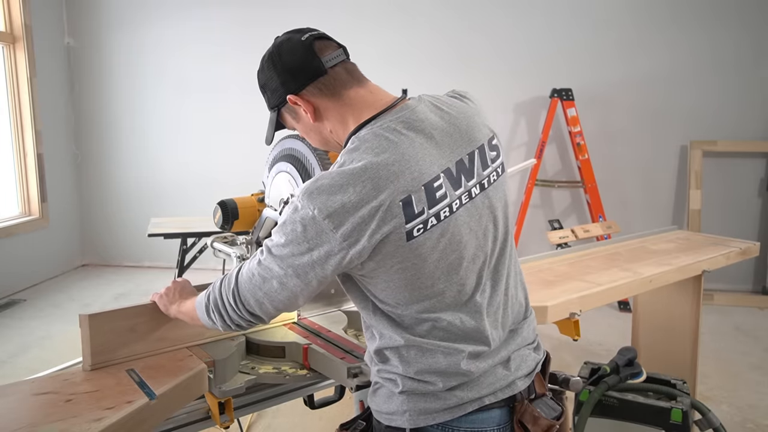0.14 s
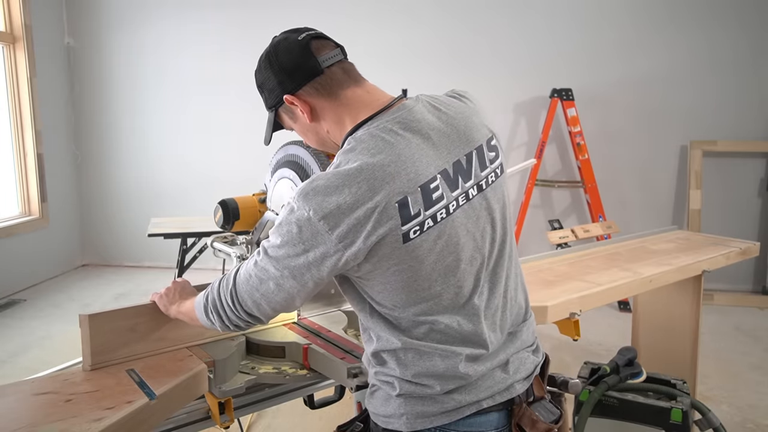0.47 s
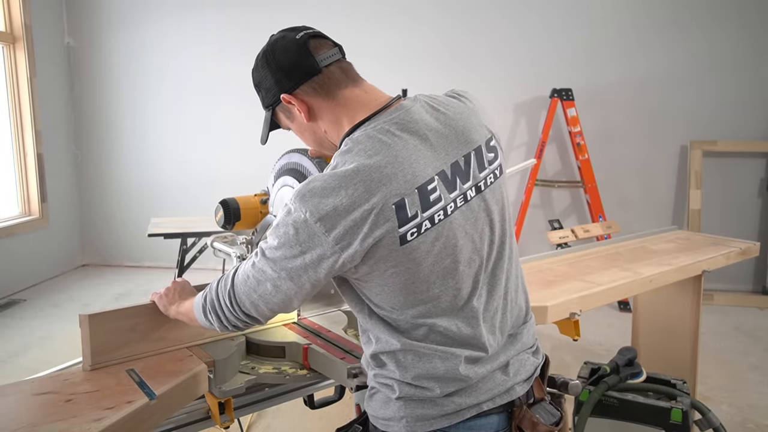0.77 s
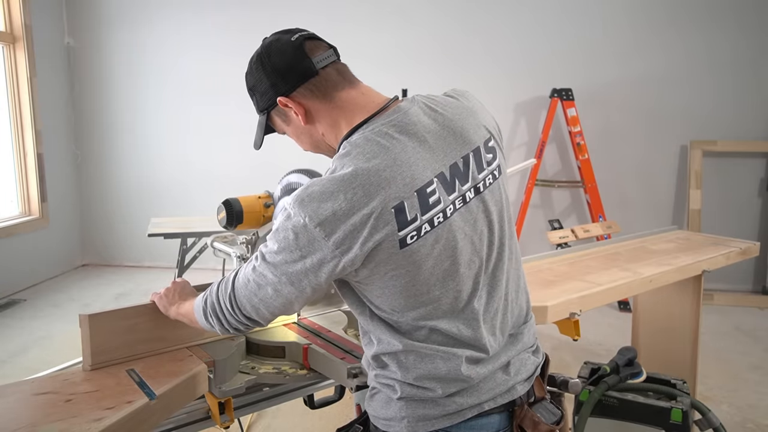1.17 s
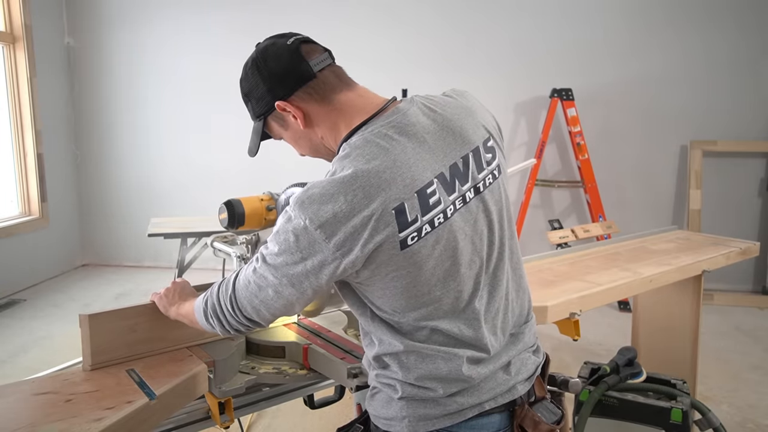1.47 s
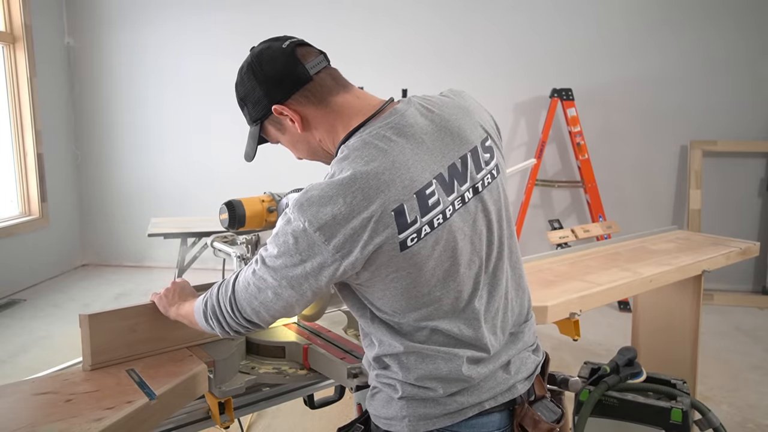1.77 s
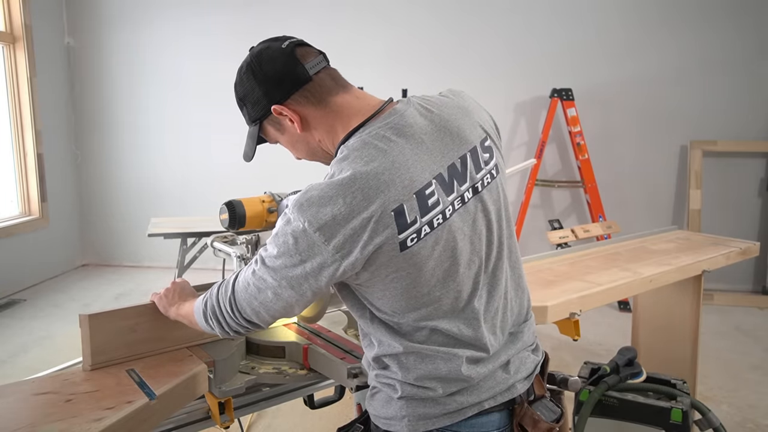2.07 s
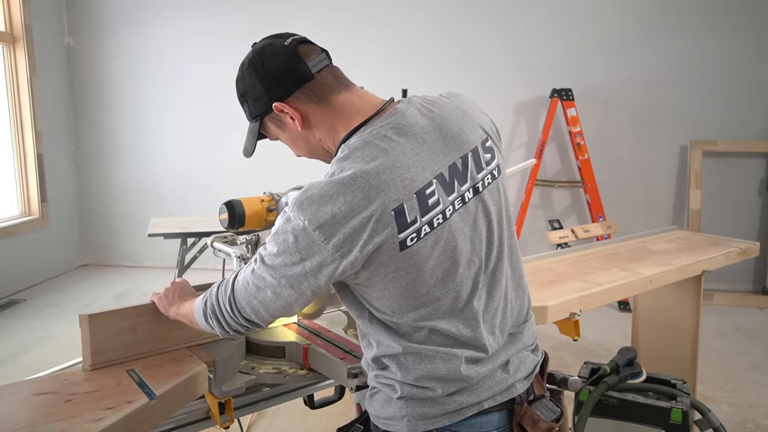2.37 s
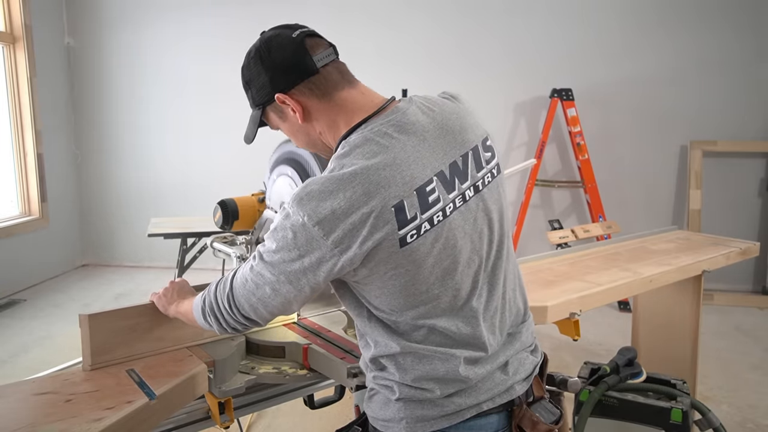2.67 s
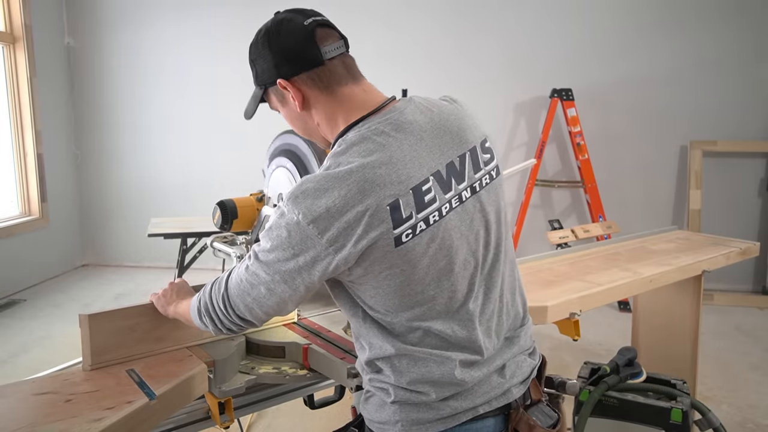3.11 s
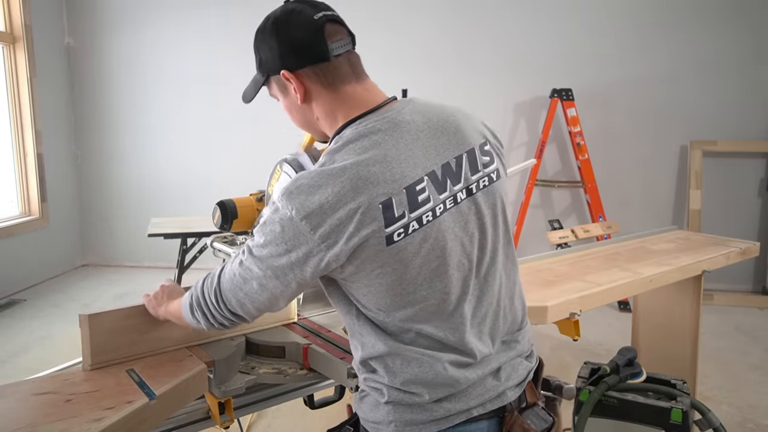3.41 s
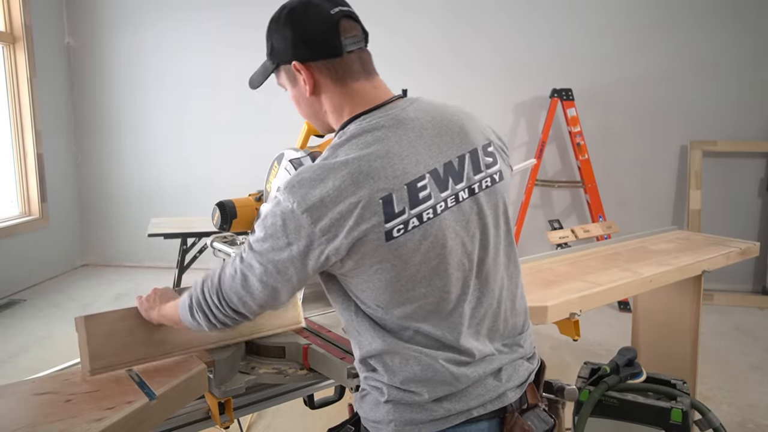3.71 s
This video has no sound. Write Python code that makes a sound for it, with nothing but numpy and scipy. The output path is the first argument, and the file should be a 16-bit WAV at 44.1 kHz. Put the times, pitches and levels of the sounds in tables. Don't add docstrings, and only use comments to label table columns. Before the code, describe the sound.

A power miter saw in a bare, echoing room: trigger clack, fast rising motor whine and roar, gritty wood cutting, then a braked falling whine, gear knocks and a thud as the head stops; close microphone.

```python
import sys
import numpy as np
from scipy import signal
from scipy.fft import rfft, irfft, next_fast_len
from scipy.io import wavfile
from scipy.ndimage import uniform_filter1d

SR = 44100
rng = np.random.default_rng(int(sys.argv[2]) if len(sys.argv) > 2 else 0)


def pcm_store(signal):
    levels = np.round(np.clip(np.atleast_2d(signal), -1, 1) * 32767)
    wavfile.write(sys.argv[1], SR, levels.astype(np.int16).T)


def gain_from_decibels(decibels):
    exponent = np.asarray(decibels, float) / 20
    return 10 ** exponent


N = 169785
T = np.arange(N) / SR
START_S, BRAKE_S = 0.112, 2.61
TONE_FADE_DB = 3


def rms_one(x):
    return x / np.sqrt(np.mean(x ** 2) + 1e-20)


def in_time(rows):
    t_s, *columns = np.transpose(rows)
    return [np.interp(T, t_s, column) for column in columns]


def drift(rate_hz):
    pole = np.exp(-80 * np.pi * rate_hz / SR)
    slow = signal.lfilter([1], [1, -2 * pole, pole * pole], rng.standard_normal(N // 40 + 2002))[2000:]
    return np.interp(np.arange(N) / 40, np.arange(len(slow)), rms_one(slow))


def bump(centre_s, length_s):
    return np.exp(-(2 * (T - centre_s) / length_s) ** 2)


def body(hz):
    # [f/Hz, width/Hz, gain/dB]
    housing = [(670, 140, 6), (850, 40, 5), (1065, 30, 7), (1220, 90, 5), (1460, 70, 12), (1650, 50, 7),
               (2010, 100, 8), (2200, 300, 11), (2650, 60, 13), (3130, 70, 6), (3950, 250, 8),
               (4750, 150, 13), (4970, 120, 12), (5720, 110, 8), (6600, 200, 7), (8060, 170, 9),
               (8650, 170, 11), (9350, 150, 13)]
    # [f/Hz, width/Hz, gain/dB]
    plate = [(7100, 140, 6), (9820, 160, 9), (10080, 80, 8), (10520, 60, 5), (11770, 60, 14),
             (12450, 120, 7), (13500, 200, 12), (14780, 90, 14), (15300, 130, 9)]
    power = 1
    for mid_hz, width_hz, gain_db in [*housing, *plate]:
        power = power + gain_from_decibels(2 * gain_db) / (1 + (2 * (hz - mid_hz) / width_hz) ** 2)
    return np.sqrt(power)


def colour(x, spectrum, share=0):
    hz = np.arange(N // 2 + 1) * SR / N + 1
    at_hz, db = np.transpose(spectrum)
    gain = gain_from_decibels(np.interp(np.log(hz), np.log(at_hz), db))
    return rms_one(irfft(rfft(x) * gain * body(hz) ** share, N))


def patchy(x, patchy_db):
    octave = np.clip(np.log2(np.arange(N // 2 + 1) * SR / N + 1), 5, 14)
    spectrum = rfft(x)
    together, out = drift(14), 0
    for k in range(5, 15):
        part = np.cos(np.pi / 2 * np.clip(octave - k, -1, 1)) ** 2
        out = out + irfft(spectrum * part, N) * gain_from_decibels(patchy_db * (together + 0.8 * drift(20)))
    return out


def knocks(rows, modes, crack_s, crack_hz):
    out = np.zeros(N)
    t = np.arange(int(0.3 * SR)) / SR
    band = signal.butter(2, [400, crack_hz], "band", fs=SR, output="sos")
    for at_s, peak_db, bright_db in rows:
        ring = 0
        for hz, db, t60_s in modes:
            ring = ring + gain_from_decibels(db + 2 * rng.standard_normal() - 60 * t / t60_s) * np.sin(2 * np.pi * hz * t)
        crack = np.exp(-t / crack_s) * signal.sosfilt(band, rng.standard_normal(len(t)))
        hit = gain_from_decibels(peak_db) * (ring + gain_from_decibels(bright_db + 12) * crack)
        start = int(at_s * SR)
        out[start:start + len(t)] += hit[:N - start]
    return out


def room(x):
    t60_s, cut_hz = 0.99, 1830
    size = next_fast_len(N + SR)
    w = 2 * np.pi * np.arange(size // 2 + 1) / size
    dull = 1 / (1 + 1j * w * SR / (2 * np.pi * cut_hz)) ** 0.33
    echoes = 0
    for k, lag in enumerate((rng.uniform(0.02, 0.055, 10) * SR).astype(int)):
        loop = gain_from_decibels(-60 * lag / SR / t60_s) * dull * np.exp(-1j * w * lag)
        echoes = echoes + (-1) ** k * loop / (1 - loop)
    return irfft(rfft(x, size) * echoes, size)[:N]


def room_floor():
    # [f/Hz, level/dB]
    floor_spectrum = [(15, -43), (25, 2), (90, -1.5), (318, -19), (833, -19), (3180, -35), (3730, -40),
                      (15000, -31)]
    return gain_from_decibels(-55) * colour(rng.standard_normal(N), floor_spectrum)


def bench_rumble():
    # [t/s, level/dB]
    rumble_level = [(.1, -48), (.6, -49), (1.2, -72), (2.1, -51), (2.8, -51), (3.0, -56), (3.48, -58),
                    (3.55, -48), (3.85, -54)]
    low_pass = signal.butter(2, 71, fs=SR, output="sos")
    low = rms_one(signal.sosfilt(low_pass, rng.standard_normal(N)))
    return gain_from_decibels(in_time(rumble_level)[0] + 1.4 * drift(1.3)) * low


def finger_on_trigger():
    # [t/s, peak/dB, brightness/dB]
    taps = [
        (.024, -67, 0),
        (.032, -62, 0),
        (.054, -57, 0),
        (.081, -57, 0),
        (.098, -57, 0),
    ]
    # [f/Hz, level/dB, t60/s]
    grip_modes = [(825, 14, 0.025), (1410, -6, .04), (1960, 1, 0.066), (2920, -9, 0.035)]
    return knocks(taps, grip_modes, crack_s=0.011, crack_hz=3200)


def trigger_switch():
    # [t/s, peak/dB, brightness/dB]
    clacks = [
        (.1122, -23.5, 3),
        (.1165, -12.5, -10),
        (.1225, -17, -16),
        (.141, -20.5, -22),
    ]
    # [f/Hz, level/dB, t60/s]
    switch_modes = [(626, -7, 0.11), (1596, 2.5, 0.028), (1976, 2.5, 0.025), (2620, -10, 0.047),
                    (3860, -11, 0.016), (6540, -2, 0.026)]
    return knocks(clacks, switch_modes, crack_s=0.0047, crack_hz=7900)


def gear_backlash():
    # [t/s, peak/dB, brightness/dB]
    strikes = [
        (3.178, -19, -9),
        (3.220, -13, -6),
    ]
    # [f/Hz, level/dB, t60/s]
    case_modes = [(1150, -2, .03), (2230, 0, .035), (2700, -8, .03), (5800, -7, .02)]
    return knocks(strikes, case_modes, crack_s=0.00081, crack_hz=5100)


def head_stop():
    # [t/s, peak/dB, brightness/dB]
    landings = [
        (3.5155, -20.5, -4),
        (3.518, -13.5, -15),
        (3.524, -16, -30),
        (3.545, -29, -9),
        (3.575, -29, -18),
    ]
    # [f/Hz, level/dB, t60/s]
    arm_modes = [(230, -30, .04), (410, -21, .06), (610, -7, .04), (690, -4, 0.07), (790, -8, .03),
                 (920, -4.5, 0.027), (1186, -6, 0.025), (2320, -20, 0.05), (2920, -30, 0.018)]
    return knocks(landings, arm_modes, crack_s=0.0065, crack_hz=5050)


def shaken_parts():
    # [t/s, length/s, f/Hz, rms/dB]
    ringing = [
        (.25, .1, 1500, -32),
        (.45, .25, 2650, -30),
        (.5, .15, 1445, -26),
        (2.32, .15, 12500, -37),
        (2.81, .08, 2010, -27),
        (3.08, .12, 2655, -28),
        (3.1, .12, 3900, -35),
        (3.2, .1, 2240, -33),
        (3.635, .03, 6800, -42),
        (3.76, .15, 1500, -41),
    ]
    width_hz, out = 35, 0
    for at_s, length_s, hz, db in ringing:
        flutter = drift(width_hz) + 1j * drift(width_hz) + 1
        tone = np.real(flutter * np.exp(2j * np.pi * hz * T))
        out = out + 0.8 * gain_from_decibels(db) * bump(at_s, length_s) * tone
    return out


def exit_grit():
    sizes = gain_from_decibels(4 * np.minimum(rng.exponential(1, N), 3)) * rng.choice([-1, 1], N)
    grains = sizes * (rng.random(N) < 4000 / SR)
    spectrum = [(1500, -25), (3500, 3), (7000, -6), (15000, -4)]  # f/Hz, level/dB
    return gain_from_decibels(-24) * bump(2.5, 0.14) * colour(grains, spectrum, share=0.4)


def cut():
    # [f/Hz, level/dB per Hz]
    chip_spectrum = [(180, -52), (300, -13.5), (953, -2.5), (1140, -13.5), (1670, 5), (1910, -5.5),
                     (8840, -14), (15500, -17)]
    start_s, rise_s, end_s, fall_s = 0.76, 1, 2.11, 0.73
    chips_per_s = 2200
    bite = np.clip((T - start_s) / rise_s, 0, 1) * np.clip(1 - (T - end_s) / fall_s, 0, 1)
    sizes = gain_from_decibels(4.9 * np.minimum(rng.exponential(1, N), 3.5)) * rng.choice([-1, 1], N)
    born = rng.random(N) < chips_per_s * gain_from_decibels(2 * drift(25)) / SR
    return gain_from_decibels(-17.5) * bite * colour(sizes * born, chip_spectrum, share=0.41)


def growl():
    t60_s = 1.74
    spectrum = [(60, -26), (363, -8), (750, 0), (3000, -40)]  # f/Hz, level/dB
    low = colour(rng.standard_normal(N), spectrum)
    return gain_from_decibels(-30 + 2 * drift(22) - 60 * np.maximum(T - BRAKE_S, 0) / t60_s) * low


def inrush_hum():
    # [f/Hz, level/dB]
    hum_tones = [(118.4, -35), (231.5, -65), (360.7, -29), (479.1, -26.5)]
    t60_s = 0.95
    hum = sum(gain_from_decibels(db + 7 + 3.3 * drift(16)) * np.sin(2 * np.pi * hz * T) for hz, db in hum_tones)
    return hum * gain_from_decibels(-60 * T / t60_s)


def motor(speed):
    # [t/s, roar/dB, extra hiss/dB]
    effort = [(0.17, -32, 48), (0.28, -20, 34), (0.36, -18.5, 26.5), (0.53, -17.5, 19), (1.04, -20.5, 9),
              (1.27, -21, 7.5), (1.82, -18.5, 3.5), (2.66, -18.5, -3.5), (2.82, -23, 2.5), (3.09, -22, 16),
              (3.26, -26, 18.5), (3.46, -27, 20), (3.71, -33, 15), (3.85, -33.5, 18)]
    # [f/Hz, level/dB per Hz]
    roar_spectrum = [(100, -41), (250, -21.5), (1200, -9.5), (2700, -9), (4200, -10), (4800, -19.5),
                     (8300, -17.5), (11000, -41.5), (15500, -44)]
    # [f/Hz, level/dB per Hz]
    hiss_spectrum = [(1470, -41), (2500, -4), (4120, -12), (5270, 3.5), (9610, 0), (10500, 1),
                     (15700, -8.5)]
    body_share, rattle_db = 0.7, 1.3
    top_hz, top_opens_s, top_shut_db = 10800, 0.61, -9
    full_speed, hiss_db_per_octave = 400, 29

    roar_db, hiss_db = in_time(effort)
    throb = 1 + 0.08 * np.cos(2 * np.pi * 120 * T) * (T < BRAKE_S)
    roar = patchy(colour(throb * rng.standard_normal(N), roar_spectrum, body_share), rattle_db)
    hiss = colour(throb * rng.standard_normal(N), [(500, -40)] + list(hiss_spectrum), body_share)
    hiss = patchy(hiss, rattle_db * 0.7)
    high_pass = signal.butter(4, top_hz, "high", fs=SR, output="sos")
    top = signal.sosfilt(high_pass, hiss[::-1])[::-1]
    top = signal.sosfilt(high_pass, top)
    hiss = hiss - top * (1 - gain_from_decibels(top_shut_db)) * np.clip((top_opens_s - T) / 0.02, 0, 1)
    hiss_db = -23.5 + hiss_db + hiss_db_per_octave * np.log2(speed / full_speed)
    return gain_from_decibels(roar_db) * roar + gain_from_decibels(hiss_db) * hiss


def swells(turns):
    multiples = [12, 16, 16.8, 22.05, 22.4, 23.8, 25.2, 28, 29.7, 33.6]
    # [t/s, length/s, rms/dB]
    surfacings = [
        [(.44, .1, -30), (3.2, .09, -34)],
        [(1.5, .3, -39)],
        [(2.53, .08, -27)],
        [(.39, .08, -33), (.54, .1, -31), (.79, .06, -30), (1.4, .15, -31)],
        [(.66, .12, -30), (1.1, .3, -36)],
        [(2.41, .12, -31)],
        [(1.84, .1, -33)],
        [(2.45, .08, -25)],
        [(.56, .16, -35), (3.0, .1, -43)],
        [(.62, .08, -36), (1.4, .3, -41)],
    ]
    out = 0
    for k, rows in zip(multiples, surfacings):
        level = sum(np.sqrt(2) * gain_from_decibels(db) * bump(at_s, length_s) for at_s, length_s, db in rows)
        out = out + level * gain_from_decibels(TONE_FADE_DB * drift(33)) * np.sin(2 * np.pi * (k * turns + rng.random()))
    return out


def whine(speed):
    gear_turns = [6, 12, 18, 22]
    gear_levels_db = [-29, -38, -59, -32]
    gear_brake_levels_db = [-27.5, -38, -29, -28]
    gear_fades = [0.1, 0.1, -34, -20]
    field_turns = [2.1, 2.8, 3.8, 8.4, 14, 19.6, 28, 36.4, 42]
    field_levels_db = [-40.5, -38, -42, -45, -31.5, -34, -36.5, -41.5, -39]
    # [t/s, gear/dB, field/dB, extra for high commutator tones/dB]
    load = [(.12, -17, -27, -29.5), (.3, -4, -10, -20), (.46, 3, -4.5, -14), (.58, 4, 4.5, -10),
            (.64, 2, 0.5, 8.5), (.9, -6, 5, -3), (1.1, 2, 0.5, 4), (1.55, -0.5, 2, 1.5),
            (1.9, -0.5, 1.5, 0), (2.1, -16, -7, -5), (2.6, -7, -7, 2), (2.66, 0, 0, -5), (2.82, -3, 0, 0),
            (2.93, -11, -2, 0), (3.12, -1.5, 2, 2), (3.24, -12, -2, 0), (3.38, -16, -16, -5),
            (3.85, -26, 8, -11)]
    high_turns, fan_turns, gear_ratio = 28, 18, 7.4

    braking = np.clip((T - BRAKE_S) / 0.012, 0, 1)
    after_brake_s = np.maximum(T - BRAKE_S, 0)
    turns = np.cumsum(speed * (1 + (0.001 + 0.007 * braking) * drift(42.6))) / SR
    runout = 1 + 0.4 * np.cos(2 * np.pi * turns / gear_ratio)
    mains = 1 + 0.55 * np.clip(1 - T, 0, 1) * np.cos(2 * np.pi * 120 * T)
    pulse_db = 20 * np.log10(runout) + 20 * np.log10(mains)
    gear_db, field_db, high_db = in_time(load)

    tones = []  # multiple, level/dB, exponent on body resonances
    for k, run_db, brake_db, fade in zip(gear_turns, gear_levels_db, gear_brake_levels_db, gear_fades):
        is_fan = k >= fan_turns
        db = np.minimum(gear_db, -4 if is_fan else 20) + pulse_db + run_db
        db = db + (brake_db - run_db + 3 * drift(21)) * braking + fade * after_brake_s
        tones.append((k, db, 0.25 if is_fan else 1))
    for k, level_db in zip(field_turns, field_levels_db):
        is_high = k >= high_turns
        tones.append((k, field_db + high_db * is_high + level_db - 30 * braking, 1.3 if is_high else 1))

    out = swells(turns)
    slow = np.arange(0, N, 64)
    for k, db, contrast in tones:
        resonance = np.interp(np.arange(N), slow, body(k * speed[slow]) ** contrast)
        sine = np.sin(2 * np.pi * (k * turns + rng.random()))
        out = out + gain_from_decibels(db + TONE_FADE_DB * drift(45)) * resonance * sine
    return out


def armature_speed():
    # [t/s, speed/turns per s]
    speed_points = [(0.11, 8), (0.25, 130), (0.37, 204), (0.48, 245), (0.62, 285.5), (0.74, 309.8),
                    (0.92, 332.1), (1.04, 342.7), (1.16, 351.7), (1.4, 364.5), (1.88, 391.9), (2.24, 411.6),
                    (2.62, 426.5), (2.74, 357), (2.92, 270.5), (3.16, 191), (3.46, 124), (3.85, 70)]
    return uniform_filter1d(in_time(speed_points)[0], size=1500, mode="nearest")


def scene():
    speed = armature_speed()
    on = np.clip((T - START_S) / 0.023, 0, 1)
    saw = on * (whine(speed) + motor(speed) + inrush_hum() + growl())
    saw = saw + cut() + exit_grit() + shaken_parts()
    saw = saw + finger_on_trigger() + trigger_switch() + gear_backlash() + head_stop()
    background = room_floor() + on * bench_rumble()
    return (saw + gain_from_decibels(-17) * room(saw) + background)[None]


def top_cut(x):
    return signal.sosfilt(signal.butter(12, 15870, fs=SR, output="sos"), x)


def record(dry):
    mic = signal.sosfilt(signal.butter(1, 30, "high", fs=SR, output="sos"), dry)
    return top_cut(np.tanh(mic))


dry = scene()
out = record(dry)
pcm_store(out)
```